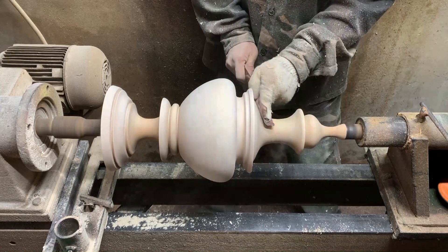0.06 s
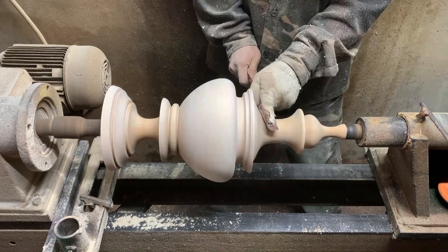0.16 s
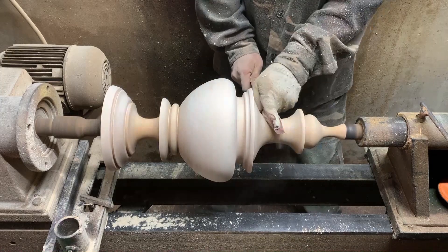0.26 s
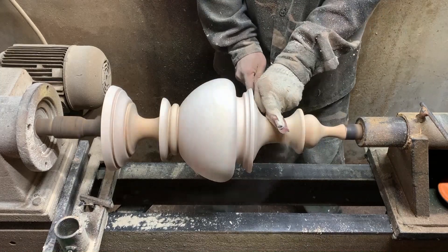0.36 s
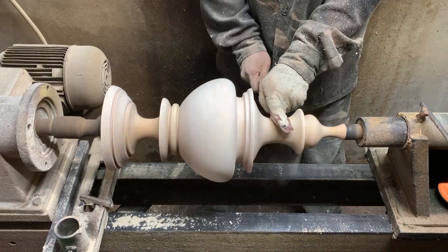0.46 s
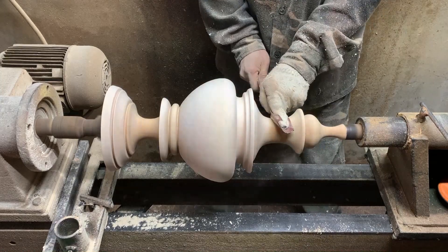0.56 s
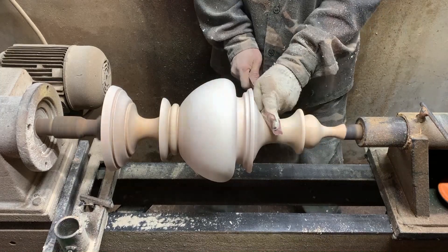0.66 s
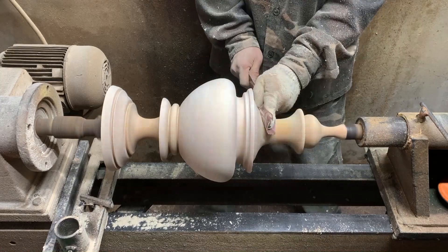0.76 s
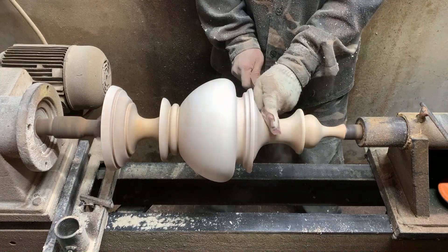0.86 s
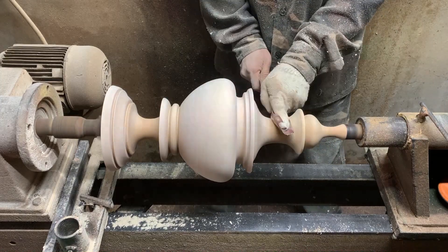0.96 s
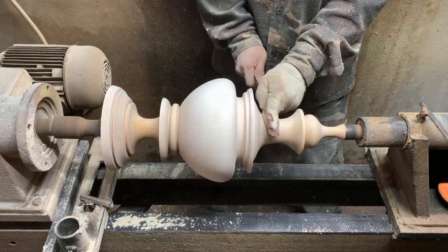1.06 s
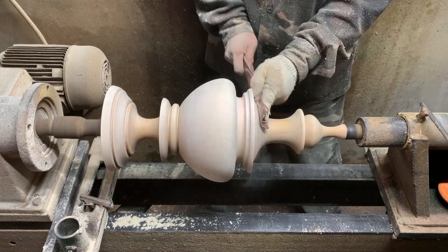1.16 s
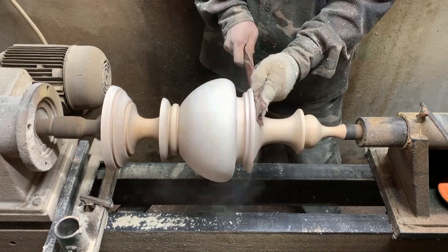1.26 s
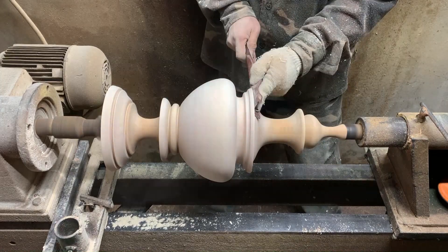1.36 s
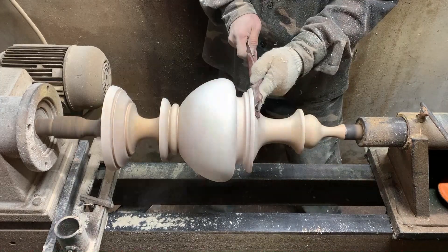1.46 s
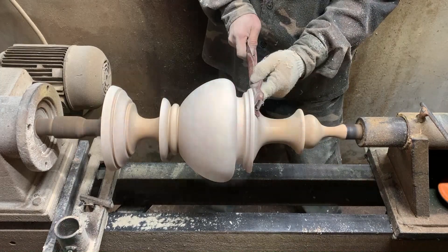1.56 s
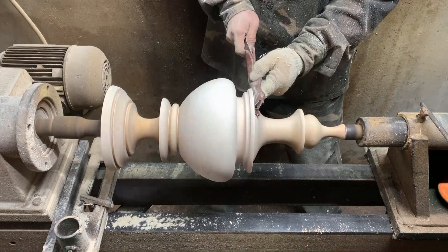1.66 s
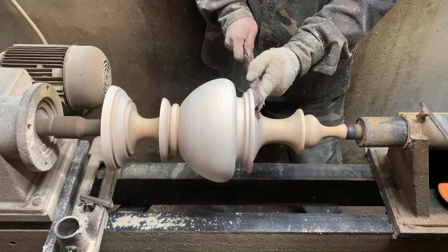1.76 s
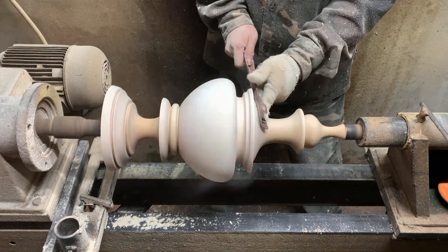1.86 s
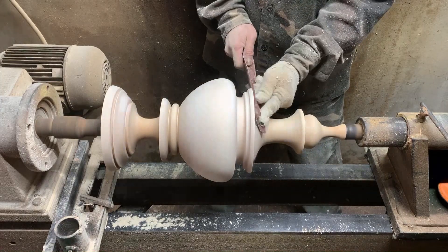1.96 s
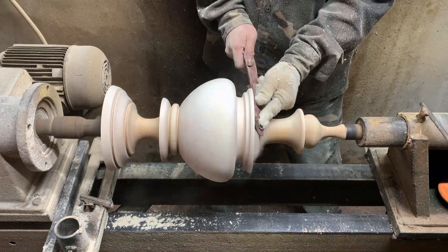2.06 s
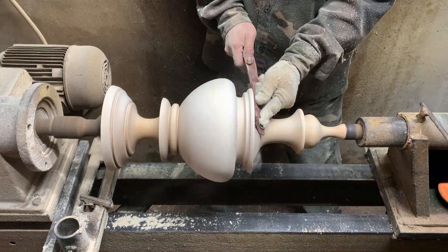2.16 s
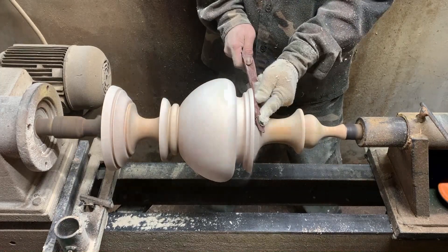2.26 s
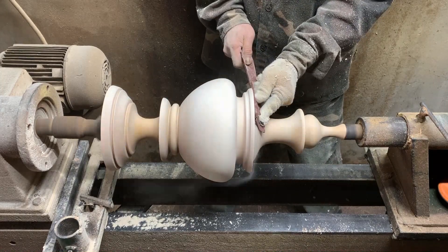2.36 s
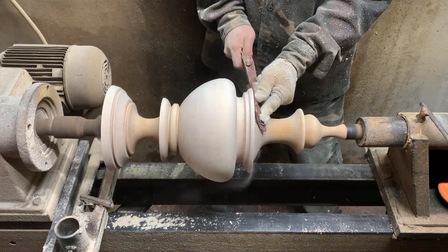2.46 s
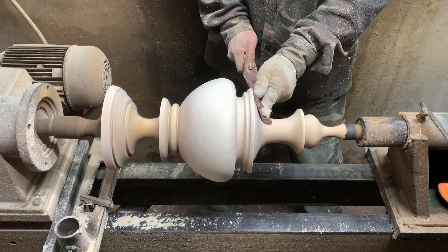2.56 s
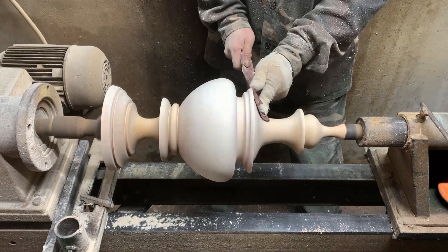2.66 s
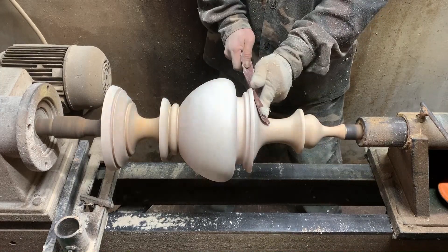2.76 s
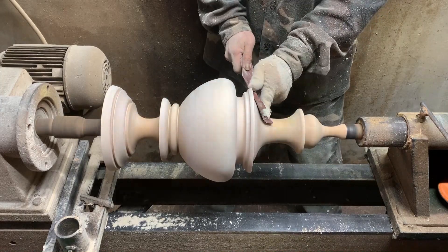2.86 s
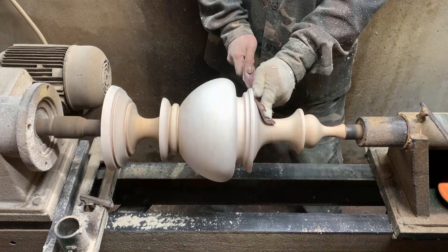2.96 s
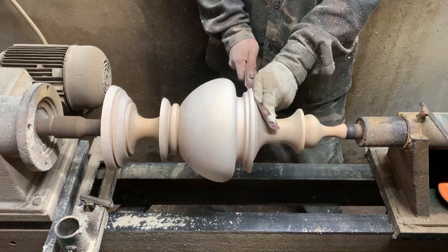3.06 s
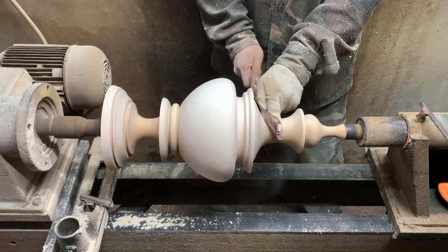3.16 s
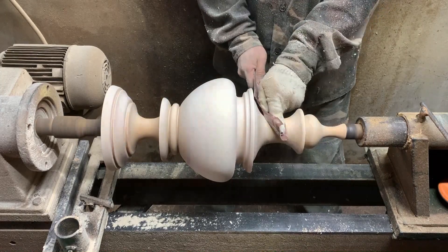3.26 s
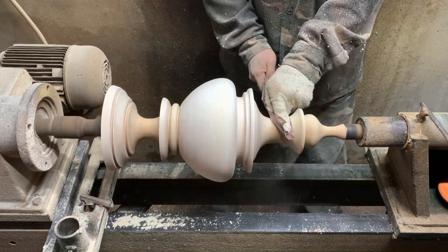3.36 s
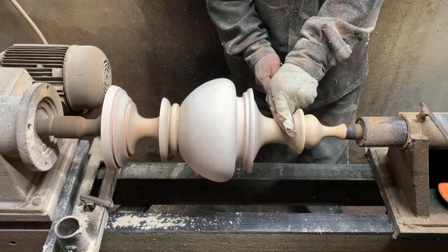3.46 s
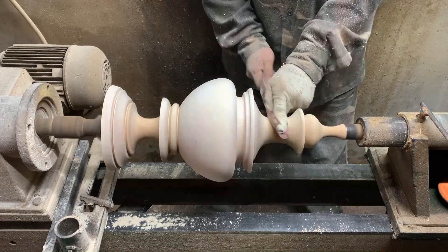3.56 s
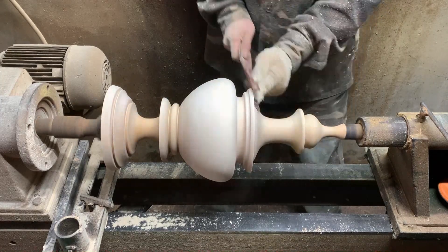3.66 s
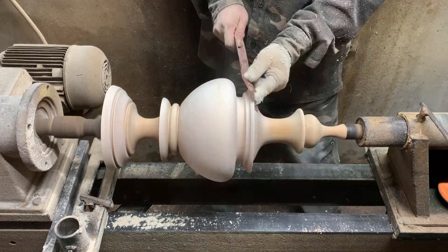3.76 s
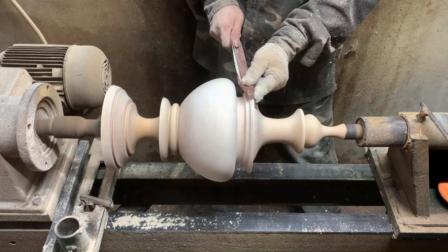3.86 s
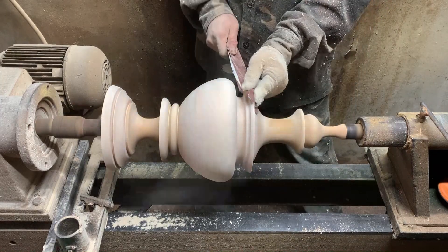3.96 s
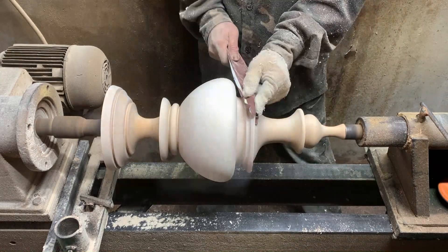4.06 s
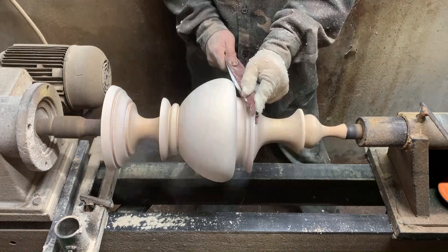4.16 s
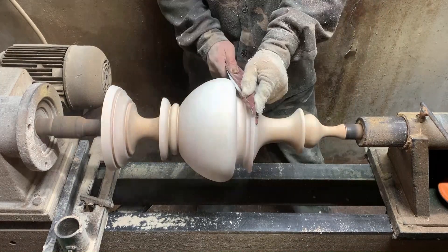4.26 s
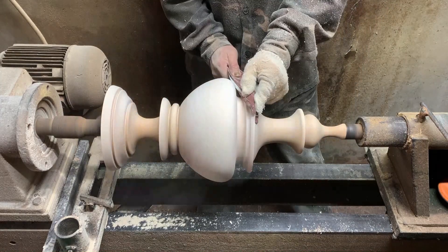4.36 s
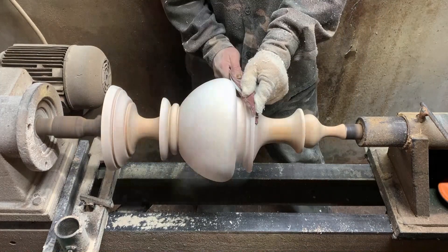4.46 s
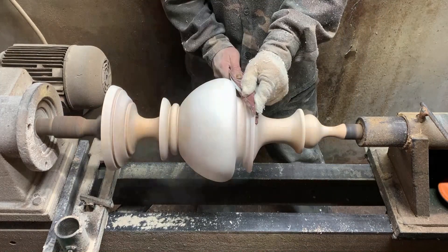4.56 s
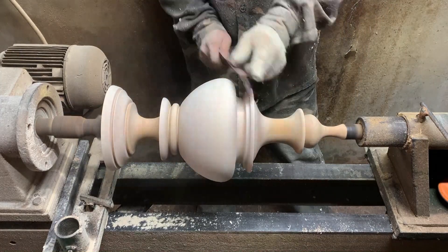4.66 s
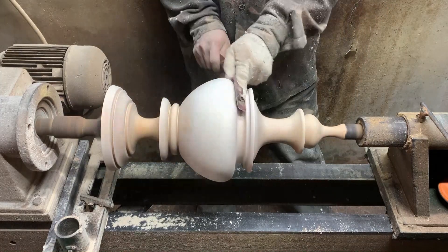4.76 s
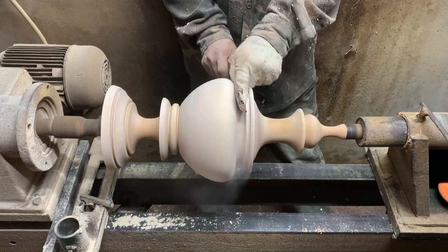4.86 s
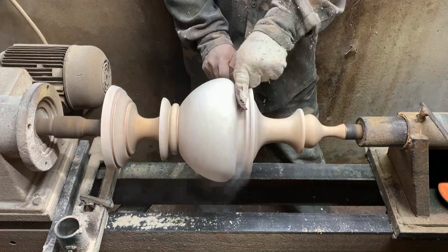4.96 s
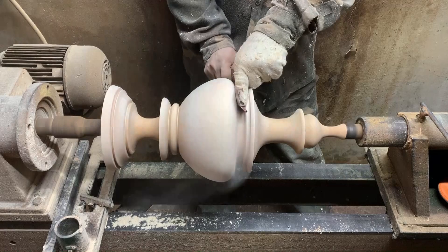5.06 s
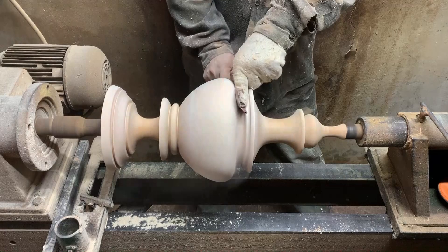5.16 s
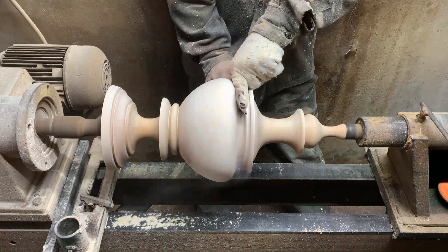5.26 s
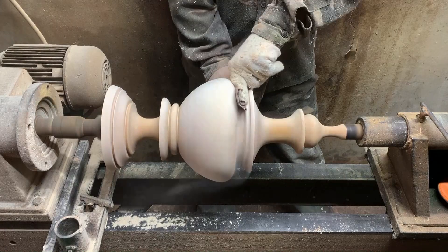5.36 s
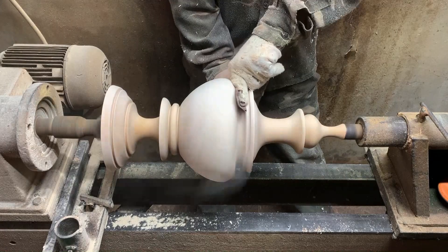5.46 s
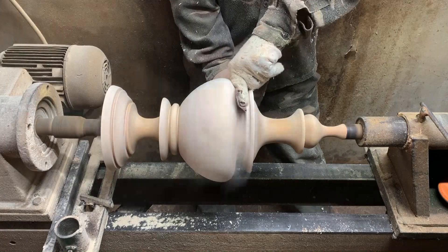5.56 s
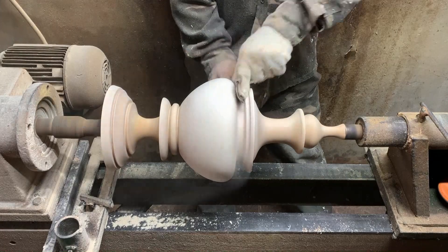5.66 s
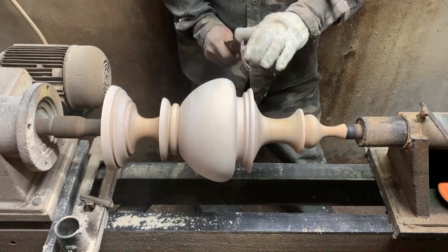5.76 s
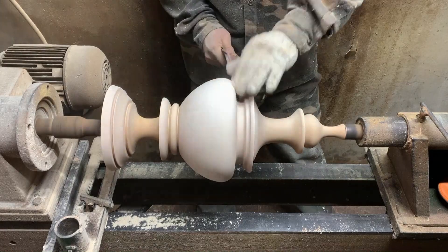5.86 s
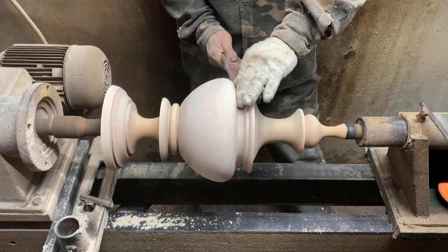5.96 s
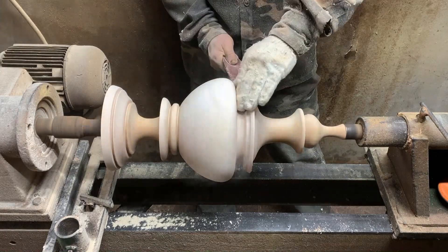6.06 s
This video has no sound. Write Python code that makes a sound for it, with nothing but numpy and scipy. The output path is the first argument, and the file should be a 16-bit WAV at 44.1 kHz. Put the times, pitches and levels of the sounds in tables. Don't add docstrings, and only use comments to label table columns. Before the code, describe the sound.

A workshop lathe runs at constant speed throughout: a nasal mid-pitched whine with a rapid buzzing throb, broad casing hum and thin, faint electrical whistles. From the start, sandpaper on spinning wood makes a dry, fine-grained hiss, wide in stereo, growing duller or brighter as the hand travels, with a slight rasp at 0.2 s, a chirp around 0.7 and a low squeak near 1.0. Soft low air buffets hit the close microphones in clumps around 1.4, 2.4 and 3.5 s. The rubbing changes in small nudges near 3.7 to 4.0. At about 4.7 s the paper lifts for a moment amid air thumps, then lands at 4.8 with a stronger, fuller rasp, loudest near 5.0. A heavy puff comes near 5.4. The paper leaves again from 5.7 to nearly 6.0, exposing the motor, with a tiny tick, then lightly resumes until the end.

```python
import sys
import numpy as np
from scipy import signal
from scipy.fft import rfft, irfft, next_fast_len
from scipy.io import wavfile
from scipy.ndimage import uniform_filter1d, map_coordinates

SR = 44100
rng = np.random.default_rng(int(sys.argv[2]) if len(sys.argv) > 2 else 0)


def to_wav(s):
    ch = np.atleast_2d(s).T
    pcm = np.round(np.clip(ch, -1, 1) * 32767)
    wavfile.write(sys.argv[1], SR, pcm.astype(np.int16))


def amplitude_ratio(level_db):
    exponent = np.asarray(level_db, float) / 20
    return 10 ** exponent


N = 269892
T = np.arange(N) / SR


def unit(x):
    return x / np.sqrt(np.mean(x ** 2) + 1e-20)


def along(points, hz):
    point_hz, value = np.transpose(points)
    return np.interp(np.log(hz + 1), np.log(point_hz + 1), value)


def curves(rows):
    time_s, *columns = np.transpose(rows)
    return [np.interp(T, time_s, column) for column in columns]


def bell(centre_s, length_s):
    return np.exp(-((T - centre_s) / length_s) ** 2)


def wobble(rate_hz):
    knots = rng.standard_normal(int(N * rate_hz / SR) + 4)
    return map_coordinates(knots, [T * rate_hz])


def noise():
    return rng.standard_normal((2, N))


def filtered(x, response):
    size = next_fast_len(N + 8192)
    hz = np.fft.rfftfreq(size, 1 / SR)
    return irfft(rfft(x, size) * response(hz), size)[..., :N]


def coloured(x, spectrum):
    closed = [(spectrum[0][0] / 2, -120)] + spectrum + [(spectrum[-1][0] * 2, -120)]
    return unit(filtered(x, lambda hz: amplitude_ratio(along(closed, hz))))


def resonances(modes, hz, order):
    power = 0
    for centre_hz, width_hz, level_db in modes:
        power = power + amplitude_ratio(2 * level_db) / (1 + (2 * (hz - centre_hz) / width_hz) ** 2) ** order
    return np.sqrt(power)


def steadied(x, share, seconds):
    power = uniform_filter1d(x ** 2, int(seconds * SR), axis=-1)
    level = np.sqrt(np.abs(power) + 1e-6)
    return unit(x / level ** share)


def shaft_angle():
    shaft_hz, first_s, every_s, shift_s = 39.3, -.15, 1.0, .05
    # ahead_rad, creep_rad_per_s
    shifts = [(0.5, 0.7), (-0.36, 0.75), (2, 1.3), (2, 1.3), (4, -0.94), (2.9, -2.8), (1.5, 3.5)]
    ahead = []
    for i, (ahead_rad, creep) in enumerate(shifts):
        for later_s in (0, every_s - shift_s):
            ahead.append((first_s + every_s * i + later_s, ahead_rad + creep * later_s))
    return 2 * np.pi * shaft_hz * T + curves(ahead)[0]


def whine():
    # centre_hz, width_hz, level_db
    low_left = [(653, 30, 0), (708, 30.6, 2.1)]
    low_right = [(649.6, 21.3, -4.5), (730, 46, -7)]
    high_left = [(1397.5, 28, 19), (1330, 44, -14)]
    high_right = [(1403, 31, -19), (1383, 15, -13)]
    # time_s, strain_db
    load = [(0, 0), (1, .3), (2, 0.2), (3, 0), (3.75, 0), (3.95, 2.5), (5.6, 2.5), (6.12, 0.5)]

    def band(left, right):
        return unit(filtered(noise(), lambda hz: [resonances(m, hz, order=1) for m in (left, right)]))

    angle = shaft_angle()
    load_db, = curves(load)
    low_beat = 1 + [[.52], [.46]] * np.cos(angle + [[.4], [-.4]]) + 0.26 * np.cos(3 * angle)
    high_beat = 1 + [[.62], [.42]] * np.cos(angle + [[-.1], [.1]])
    low = unit(low_beat * steadied(band(low_left, low_right), share=.85, seconds=.03))
    high = unit(high_beat * steadied(band(high_left, high_right), share=.9, seconds=.022))
    both = amplitude_ratio(-33 - 0.27 * load_db) * low + amplitude_ratio(-37.5 + load_db) * high
    return filtered(both, lambda hz: 1 / (1 + (hz / 4200) ** 4))


def steady_tones():
    # pitch_hz, level_db
    pitches = [(657, -49.5), (1427, -50), (1467, -54), (11872, -66), (12032, -63)]
    # time_s, level_db
    singing = [(0, 5), (1, 5), (1.3, 7), (2.5, 10), (2.65, 11), (3.7, 0), (4.1, 7), (6.12, -15)]
    total = np.zeros((2, N))
    for pitch_hz, level_db in pitches:
        phase = 3.3 * np.array([wobble(6), wobble(8.3)])
        total += amplitude_ratio(level_db + 2.5 * wobble(2.49)) * np.sin(2 * np.pi * pitch_hz * T + phase)
    return amplitude_ratio(curves(singing)[0]) * total


def inverter_whistle():
    # centre_hz, width_hz, level_db
    bands = [(5200, 200, -8), (6130, 200, -4), (6650, 260, -1), (11350, 150, -6), (12000, 200, 0),
             (12690, 150, -4)]
    return amplitude_ratio(-54) * unit(filtered(noise(), lambda hz: resonances(bands, hz, order=2)))


def casing_hum():
    # hz, level_db
    spectrum = [(150, -1.5), (300, -5.5), (550, 2.5), (1000, -6.5), (1250, 0), (1600, -4.5), (1900, -2),
                (2350, -5), (2800, -13), (4500, -22), (7000, -18.5), (9500, -65), (11000, -27),
                (13200, -38), (13800, -80)]
    return amplitude_ratio(-37 + 1.16 * wobble(5.13)) * coloured(noise(), spectrum)


def drive():
    return whine() + steady_tones() + inverter_whistle() + casing_hum()


def thumps():
    # time_s, peak_db, pitch_hz, left_minus_right_db, left_lag_ms
    eddies = [(1.337, -39, 75, -4, -3.5), (1.396, -32.5, 60, -7, 2.5), (1.428, -30, 130, 1, 1),
              (1.452, -30, 78, 0, 1), (1.631, -30, 180, 2, 0.4), (2.418, -33, 85, 1, -1.5),
              (2.454, -36, 124, -3, 0), (3.395, -33.5, 151, -2, -1.5), (3.489, -27, 66, -1, -3.5),
              (3.55, -26, 150, -2, 4), (3.592, -34, 75, 0, 2), (4.713, -37, 80, 1, 2),
              (4.745, -31, 100, -2, 2), (4.762, -25, 120, 0, 1), (4.816, -34, 91, 11, 2.5),
              (5.361, -23.5, 81, 1, -1.5), (5.433, -32, 80.4, 0, 2.5), (5.822, -29.5, 107, -1, 4),
              (5.844, -37, 60, 2, -2), (5.881, -34, 80, 0, 2.5), (6.091, -38, 69, -2, 4.5)]
    sides = np.array([[.5], [-.5]])
    out = np.zeros((2, N))
    for time_s, peak_db, pitch_hz, pan_db, lag_ms in eddies:
        turn = rng.uniform(0, 2 * np.pi)
        near = slice(int((time_s - .05) * SR), int((time_s + .05) * SR))
        cycles = pitch_hz * (T[near] - time_s - lag_ms / 1000 * sides)
        push = np.exp(-(cycles / 0.5) ** 2) * np.sin(2 * np.pi * cycles * (1 - 0.43 * cycles) + turn)
        crest = np.exp(-(cycles / 0.18) ** 2) * np.sin(2 * np.pi * 2.75 * cycles + 3 * turn)
        out[:, near] += amplitude_ratio(peak_db + 6 + pan_db * sides) * (push + 0.7 * crest)
    return out


def draught():
    # time_s, length_s, level_db
    gusts = [(0, 0.32, -52), (1.03, 0.11, -56), (1.44, .12, -41), (1.6, 0.055, -52), (1.674, .04, -53),
             (1.79, 0.037, -48), (2.21, 0.14, -47.5), (2.453, 0.039, -39), (2.674, 0.065, -51),
             (3.19, .07, -49), (3.517, 0.11, -36.5), (3.95, 0.15, -58), (4.255, 0.1, -44),
             (4.512, 0.15, -58), (4.73, .06, -40), (4.967, 0.27, -46), (5.404, 0.073, -39.5),
             (5.6, 0.15, -60), (5.858, 0.072, -47), (6.12, 0.057, -46)]
    # hz, level_db
    buffet_spectrum = [(15, 4.5), (30, -2.5), (60, -2.5), (100, 3.5), (140, -1.5), (250, -44)]
    flutter_spectrum = [(70, -19), (130, -2.5), (200, -1.5), (330, -7.5), (500, -36)]
    calm = amplitude_ratio(-51)
    flow = calm + sum(amplitude_ratio(level_db) * bell(time_s, length_s) for time_s, length_s, level_db in gusts)
    lumps = amplitude_ratio(1.76 * wobble(24) + 1.3 * np.array([wobble(25), wobble(25)]))
    eddies = noise() + 0.34 * rng.standard_normal(N)
    buffet = unit(lumps * steadied(coloured(eddies, buffet_spectrum), share=0.36, seconds=0.053))
    flutter = unit(lumps * steadied(coloured(noise(), flutter_spectrum), share=0.17, seconds=0.039))
    flutter_level = amplitude_ratio(-51.5) * (flow / calm) ** 0.6
    return amplitude_ratio(2.0) * (flow * buffet + flutter_level * flutter) + thumps()


def catches():
    # time_s, pitch_hz, width_hz, length_s, level_db
    snags = [
        (.21, 5000, 1500, .03, -45),
        (.73, 2100, 600, .07, -46),
        (1.02, 945, 140, .035, -40),
        (4.97, 2400, 800, .05, -39.5),
        (5.62, 1900, 300, .04, -48),
        (5.845, 6000, 9000, .002, -52),
    ]
    total = np.zeros((2, N))
    for time_s, pitch_hz, width_hz, length_s, level_db in snags:
        modes = [(pitch_hz, width_hz, 0)]
        ring = unit(filtered(noise(), lambda hz: resonances(modes, hz, order=2)))
        total += amplitude_ratio(level_db) * bell(time_s, length_s) * ring
    return total


def scratching(patchy_db, grain_db):
    grits = noise() * amplitude_ratio(grain_db * wobble(900) + 0.64 * wobble(130))
    z = signal.stft(grits, nperseg=512)[2]
    field = rng.standard_normal(z.shape[1:])
    field = uniform_filter1d(uniform_filter1d(field, size=8, axis=0), size=10, axis=1)
    return signal.istft(z * amplitude_ratio(patchy_db * unit(field)), nperseg=512)[1][:, :N]


def sandpaper():
    # time_s, pressure_db, speed_db (as brightness: low on the neck, high on the rims)
    hand = [(0, -42, 1.5), (.25, -43.5, -2.5), (.6, -43.5, -3.5), (.85, -43, -1.5), (1.1, -44, -5),
            (1.2, -43, 0.5), (2.55, -44.5, 1.5), (2.67, -47, 0.5), (3.12, -43.5, 2.5), (3.28, -43.5, -4),
            (3.6, -44.5, -7.5), (3.7, -45, 0.5), (4.65, -44, 1), (4.85, -38.5, 1), (5.3, -38.5, 0.5),
            (5.7, -40.5, 3), (5.95, -45, -2.5), (6.12, -44, -3.5)]
    # time_s, length_s, level_db
    nudges = [(.12, .04, -2), (0.222, 0.038, 4), (0.617, .05, 2), (.8, 0.084, -4.5), (1.28, 0.032, 3),
              (1.376, 0.035, -1), (1.838, 0.043, 2), (1.895, .02, 0), (2.0, 0.049, 2.5),
              (2.594, 0.039, 4.5), (2.968, 0.052, 1.5), (3.157, .03, 5.5), (4.973, 0.13, 2),
              (3.04, .03, 0.5), (3.665, 0.073, 4), (3.74, .03, -5), (3.81, .03, 0.5), (3.894, 0.034, -7),
              (3.99, 0.1, 3.5)]
    # off_s, back_s, depth_db
    lifts = [
        (4.664, 4.808, 22.5),
        (5.722, 5.961, 23.5),
    ]
    # hz, level_db
    body_spectrum = [(900, 1), (1800, 4), (2600, 9), (4200, 2), (5500, -6.5), (7000, -12)]
    grit_spectrum = [(2500, -32), (3600, -4.5), (4600, 0.5), (7500, 3.5), (8100, -7.5), (9000, -35)]
    bite_spectrum = [(6500, -34), (7700, -7.5), (8200, -1), (9000, -2), (9900, -6), (11000, -20),
                     (12500, -45)]
    sheen_spectrum = [(9000, -18.5), (10500, -1), (11500, 0), (13000, -1), (14500, -6.5), (15800, -8)]

    def lifted_db(lead_s):
        leave_s, land_s = .065, .035
        total = 0
        for off_s, back_s, depth_db in lifts:
            height = np.minimum((T - off_s) / leave_s, (back_s - lead_s - T) / land_s)
            total = total + depth_db * np.clip(height, 0, 1)
        return total

    pressure_db, speed_db = curves(hand)
    firm_db = pressure_db - np.median(pressure_db)
    nudge_db = sum(level_db * bell(time_s, length_s) for time_s, length_s, level_db in nudges)
    lift_db = lifted_db(0)
    edge_db = lift_db - lifted_db(0.014)
    pressure_db = pressure_db + nudge_db - lift_db

    body_db = -6 - 0.72 * speed_db + firm_db - 0.86 * nudge_db
    bite_db = 2 + 0.27 * speed_db + 0.023 * firm_db - 0.88 * nudge_db + 0.0067 * lift_db + edge_db
    sheen_db = -5 + speed_db + 0.086 * firm_db - 0.7 * nudge_db + edge_db
    sheen_db = sheen_db + 1.2 * np.minimum(pressure_db + 53, 0)

    grits = scratching(patchy_db=1.0, grain_db=0.85)
    hiss = amplitude_ratio(-1.1) * coloured(grits, grit_spectrum)
    hiss = hiss + amplitude_ratio(body_db + 2.0) * coloured(grits, body_spectrum)
    hiss = hiss + amplitude_ratio(bite_db - 6.5) * coloured(grits, bite_spectrum)
    hiss = hiss + amplitude_ratio(sheen_db + 2.5) * coloured(grits, sheen_spectrum)
    tremble_db = 0.046 * wobble(2.9) + .5 * wobble(23.77)
    return amplitude_ratio(pressure_db + 3 + tremble_db) * hiss


def scene():
    return drive() + draught() + catches() + sandpaper()


def low_pass(x):
    return signal.sosfilt(signal.butter(12, 15900, fs=SR, output="sos"), x)


def record(dry):
    # hz, level_db
    port_left = [(7880, 0), (8050, 2.5), (9800, -1.5)]
    port_right = [(4500, 0), (6500, 2.5), (7900, -1.5), (8030, 11), (9300, 10.5), (9900, 4.5), (11000, -1)]
    top_hz = 15730
    mix = filtered(dry, lambda hz: amplitude_ratio([along(port_left, hz), along(port_right, hz)]) * (hz < top_hz))
    return low_pass(mix)


dry = scene()
out = record(dry)
to_wav(out)
```